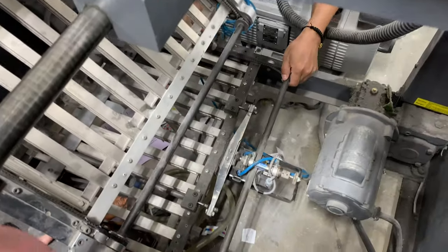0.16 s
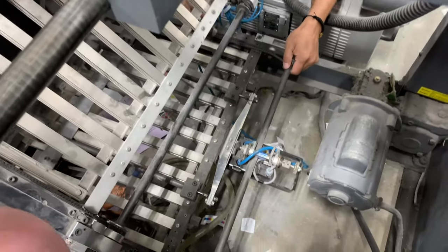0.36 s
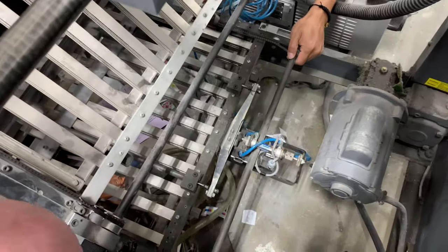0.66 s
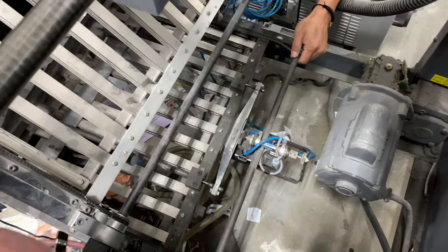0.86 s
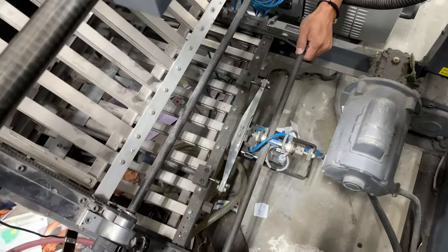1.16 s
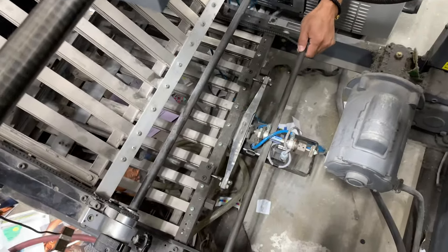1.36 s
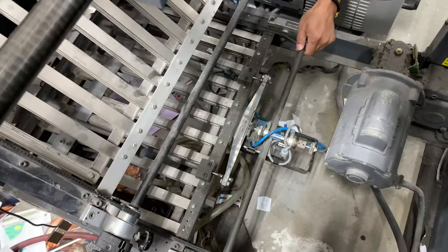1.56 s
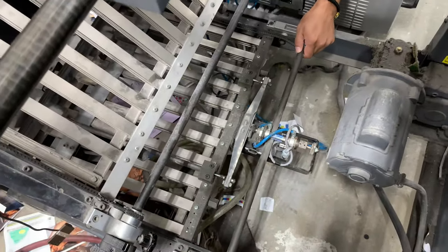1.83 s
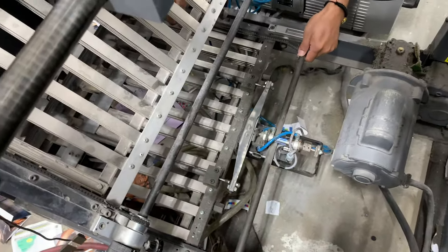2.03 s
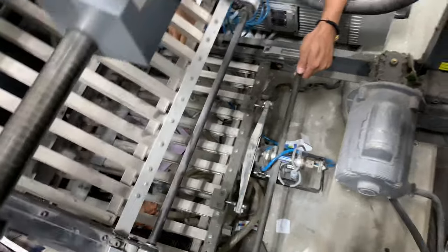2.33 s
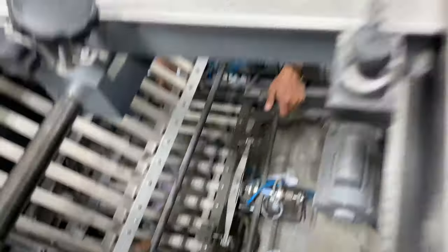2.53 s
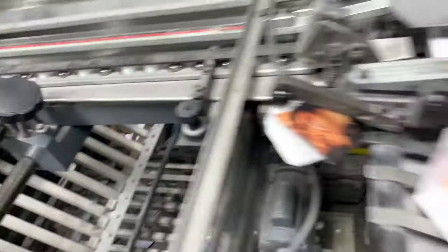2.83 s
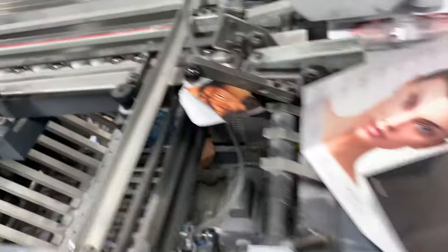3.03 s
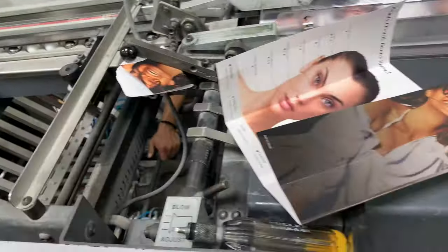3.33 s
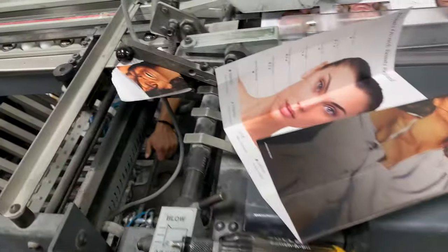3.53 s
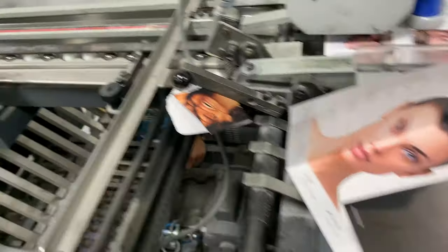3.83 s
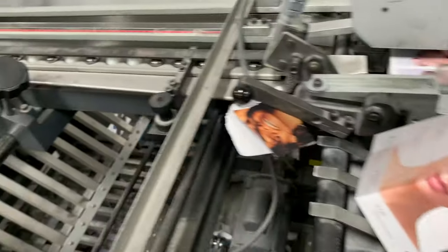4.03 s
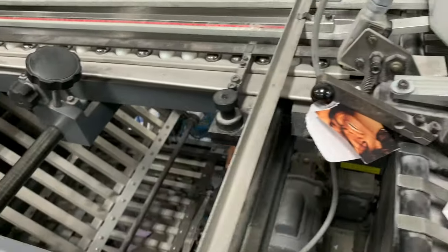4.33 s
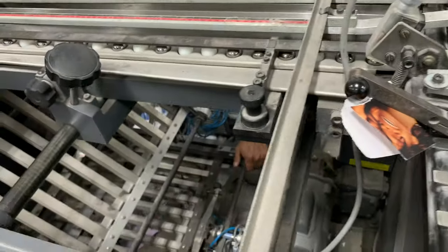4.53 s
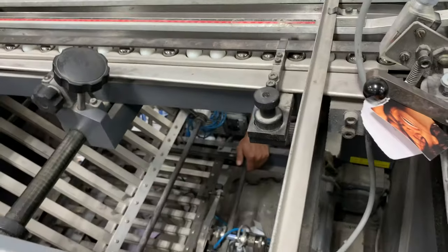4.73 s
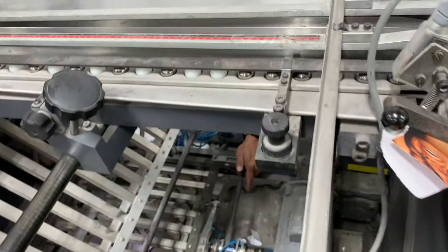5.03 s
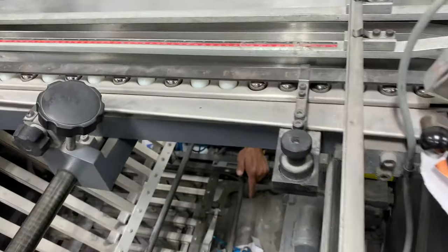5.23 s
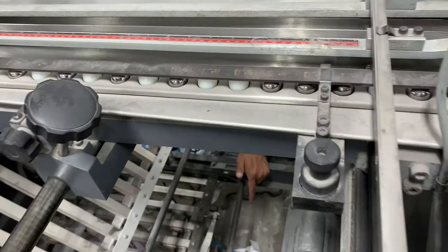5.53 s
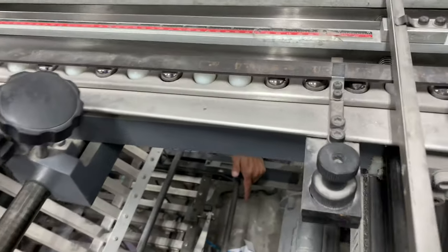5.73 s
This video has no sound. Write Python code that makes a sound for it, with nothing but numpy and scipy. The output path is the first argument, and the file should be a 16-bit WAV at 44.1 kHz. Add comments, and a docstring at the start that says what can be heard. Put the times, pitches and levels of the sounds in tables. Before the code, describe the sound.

Handheld phone stereo, close among machinery indoors. First a low throbbing hum with airy hiss and a couple of ringing steel knocks. Then a thump, a fast motor spin-up, a burst of rushing air and a short rough belt squeal that drops in pitch. The run settles as thin whine grows, and finally loud roller rumble, dull bumps and bright metallic ball chinks crowd in.

```python
"""A print workshop hums and hisses with compressed air, and metal knocks ring a steel frame.
A folding machine then starts with a thump: its motor spins up with a whine, air rushes and a belt slips.
Towards the end the rollers rumble closer, with dull bumps and chinking steel balls.
Rumble and hiss are coloured noise, motor and belt are sine waves, and knocks are noise bursts that ring.
A hand-held phone hears it all through two microphone ports."""
import sys
import numpy as np
from scipy import signal
from scipy.fft import rfft, irfft, next_fast_len
from scipy.io import wavfile
from scipy.ndimage import uniform_filter1d

SR = 44100
rng = np.random.default_rng(int(sys.argv[2]) if len(sys.argv) > 2 else 0)


def decibels_to_gain(level_db):
    """Convert a level in decibels to a linear amplitude gain (20 dB per decade)."""
    exponent = np.asarray(level_db, float) / 20
    return 10 ** exponent


def transcribe(u):
    """Save the signal u as a 16-bit wav file named by the first command-line argument.

    u: samples, shape (n,) or (channels, n), limited to [-1, 1]; the rate is SR.
    q: integer samples, one column per channel.
    """
    v = np.clip(np.atleast_2d(u).T, -1, 1)
    q = np.round(v * 32767).astype(np.int16)
    wavfile.write(sys.argv[1], SR, q)


N = 259749
SIZE = 2 * next_fast_len(N // 2 + 1)  # working length, easy for the Fourier transform
T = np.arange(SIZE) / SR
HZ = np.fft.rfftfreq(SIZE, 1 / SR)


def curves(table):
    """Table columns read at every sample, with straight lines between the rows."""
    s, *columns = np.transpose(table)
    return [np.interp(T, s, column) for column in columns]


def ramp(at, takes):
    """0 before at, 1 once takes s have passed."""
    return np.clip((T - at) / takes, 0, 1)


def fade(at, takes):
    """1 until at, then falling to 1 / e in takes s."""
    return np.exp(-np.maximum(T - at, 0) / takes)


def burst(at, t60, rise=0.0013):
    """Envelope of a blow: a short rise in s, and a 60 dB fall in t60 s."""
    t = np.maximum(T - at, 0)
    return np.minimum(t / rise, 1) * np.exp(-np.log(1000) * t / t60)


def walk(rate):
    """Random levels held for 1 / rate s and smoothed twice; the spread is near 1."""
    hold = int(SR / rate)
    steps = np.repeat(rng.standard_normal(SIZE // hold + 1), hold)
    return 1.206 * uniform_filter1d(uniform_filter1d(steps, hold), hold)[:SIZE]


def ring(hz, width):
    """Gain of a resonance, 1 at its centre; a narrower one rings longer."""
    return 1 / (1 + 2j * (HZ - hz) / width)


# How the two microphone ports differ: f/Hz, phase by which the left leads/rad,
# share of unrelated sound/0-1, left minus right level/dB
PORTS = [(0, 0, 0, 0), (150, .02, .002, .2), (260, .15, .05, 1.2), (650, .5, .3, 3), (1300, .2, .3, 0),
         (2300, 1.0, .3, 0), (3800, 1.4, .2, 0), (4790, np.pi, 0, 0)]


def pair(wide=1.0, stray=0.0):
    """Spectra of white noise at the two ports: part common to both, part separate for each."""
    hz, _, share, _ = np.transpose(PORTS)
    share = np.clip(wide * np.interp(HZ, hz, share) + stray, 0, 1)
    noise = rfft(rng.standard_normal((3, SIZE)))
    return np.sqrt(1 - share) * noise[0] + np.sqrt(share) * noise[1:]


def airy(spectrum, flicker_db, rate, wide=1.0):
    """Coloured noise as a list of frequency bands, each flickering on its own."""
    edges = (0, 150, 400, 1000, 2500, 5000, 8000, 11000, SR)  # Hz
    hz, db = np.transpose(spectrum)
    colour = decibels_to_gain(np.interp(np.log(HZ + 1), np.log(hz), db)) * np.sqrt(SR / 2)
    low_cut = (HZ / 39) ** 14 / (1 + (HZ / 39) ** 14)
    noise = pair(wide) * colour * low_cut
    bands = []
    for lo, hi in zip(edges, edges[1:]):
        band = irfft(noise * ((HZ >= lo) & (HZ < hi)))
        bands.append(decibels_to_gain(flicker_db * walk(rate)) * band)
    return bands


# Colour of the workshop noise: f/Hz, level in each Hz/dB
SHOP = [(45, -64), (120, -63.5), (250, -67), (500, -73), (1000, -78), (1450, -78.5), (2400, -82.5),
        (4000, -84.5), (5200, -78.5), (7200, -84.5), (9000, -71.5), (11000, -66.5), (13000, -67.5),
        (15000, -66)]
# Narrow hums of other machines: f/Hz, width/Hz, level before the changes below/dB
HUMS = [(84, 6, -50), (122, 8, -47), (176, 6, -50), (510, 8, -58), (675, 4, -56), (855, 6, -57),
        (950, 10, -57), (1160, 8, -52), (1184, 4, -48), (1780, 110, -45), (6100, 300, -56)]
# Workshop as the phone moves: t/s, change below 8000 Hz/dB, hum change/dB, air hiss change/dB,
# deep thrum level/dB
MOVE = [(0, 1.5, 0, 0.5, -49), (.5, 1, 1, -1.5, -44), (1.3, 0.5, 1, -1.5, -41), (1.9, -0.5, 3, -1.5, -39.5),
        (2.6, 1, 0.5, 1.5, -43), (3.2, 2, 1, 1, -49), (3.6, 1, -10, -5, -52), (4.8, 1, -2.5, -4, -67),
        (5.9, 7.5, -11, -17, -42)]
# Delay of the hiss reflected off nearby steel: t/s, delay/ms
HISS_ECHO = [(2.1, 3.0), (2.5, 3.3), (3.3, 2.5)]


def workshop():
    """Distant machines below, an air leak hissing above 8000 Hz, and a few wavering hums."""
    body_db, hum_db, hiss_db, thrum_db = curves(MOVE)
    bands = airy(SHOP, flicker_db=0.46, rate=9.33)
    body = sum(bands[:-2])
    hiss = sum(bands[-2:])
    noise = pair()

    # each factor under a root keeps the loudness independent of the width
    tuning = sum(decibels_to_gain(db) * ring(hz, width) * np.sqrt(SR / np.pi / width) for hz, width, db in HUMS)
    hums = irfft(noise * tuning)
    thrum_hz, thrum_width_hz = 41.7, 5.3
    thrum = irfft(noise * ring(thrum_hz, thrum_width_hz) ** 2) * np.sqrt(2 * SR / np.pi / thrum_width_hz)

    # nearby steel reflects the hiss; the late copies strengthen some pitches and weaken others
    echo_ms, = curves(HISS_ECHO)
    echo = 0
    for delay_ms in (echo_ms, echo_ms / 3):
        echo = echo + 0.3 * np.array([np.interp(T - delay_ms / 1000, T, port) for port in hiss])

    hum_level = decibels_to_gain(hum_db + 1.0 * walk(8.4))
    return decibels_to_gain(body_db) * body + hum_level * hums + decibels_to_gain(thrum_db) * thrum + decibels_to_gain(hiss_db) * (hiss + echo)


# Knocks on the steel frame: t/s, peak level/dB, contact time/ms, t60 of the rattle/s
KNOCKS = [(.708, -28, 0.26, .065), (0.715, -7.5, 0.17, 0.063), (0.724, -16.5, 0.11, 0.026),
          (0.734, -11, 0.29, 0.036), (1.619, -18, 0.47, 0.097), (3.284, -21, 0.23, 0.076)]
# Notes of the frame: f/Hz, level/dB, ring time/s (the note falls 60 dB in about 1.26 times this)
FRAME = [(576, -0.5, 0.17), (926, -9, 0.083), (1306, -3, 0.036), (1512, 6, 0.12), (1980, 1, 0.15),
         (2140, 2.5, 0.025), (2450, 3, 0.045), (2670, -6, 0.02), (3140, -3.5, 0.017), (3895, 2, 0.025),
         (5360, 5, 0.036)]


def knocks():
    """Each blow rattles briefly and rings the frame; longer contact is duller."""
    frame = 0.22 + sum(decibels_to_gain(db) * ring(hz, 1.74 / ring_s) for hz, db, ring_s in FRAME)
    frame = frame * (HZ / 500) ** 2 / (1 + (HZ / 500) ** 2)  # little below 500 Hz
    rattle = irfft(pair(wide=0.51, stray=0.3))
    out = 0
    for at, db, contact_ms, t60 in KNOCKS:
        softness = 1 / (1 + 1j * HZ * contact_ms / 600) ** 2
        hit = irfft(rfft(rattle * burst(at, t60)) * frame * softness)
        out = out + decibels_to_gain(db) * hit / np.abs(hit).max()
    return out


# Dull bumps of the rollers in their housing: t/s, level/dB, f/Hz
BUMPS = [(3.284, -26, 600), (5.11, -25, 310), (5.26, -24, 380), (5.45, -26, 560), (5.545, -23.5, 1080),
         (5.57, -22, 473), (5.61, -25, 310), (5.635, -26, 1150), (5.68, -22.5, 670), (5.745, -21, 394),
         (5.79, -26, 950), (5.84, -22, 430)]


def bumps():
    """Each bump is a short dull rattle: noise kept close to its own pitch."""
    width_hz = 96
    noise = pair() * np.sqrt(SR / np.pi / width_hz)
    out = 0
    for at, db, hz in BUMPS:
        rattle = irfft(noise * ring(hz, width_hz))
        out = out + decibels_to_gain(db) * burst(at, t60=0.2, rise=0.0087) * rattle
    return out


# Colour of the air rush: f/Hz, level in each Hz before the rush changes/dB
RUSH = [(60, -78), (130, -75), (300, -68.5), (600, -66), (1200, -66), (2200, -69), (3100, -65), (4000, -73),
        (5200, -63), (6100, -70.5), (7000, -68.5), (8000, -69.5), (9000, -66), (11000, -66.5), (13000, -65),
        (15000, -66.5)]
# Colour of the roller rumble: f/Hz, level in each Hz before nearness and housing/dB
ROLLERS = [(60, -57), (110, -48), (230, -55), (400, -52), (700, -55), (1200, -59), (2400, -64), (3500, -66),
           (5000, -67), (7000, -66), (9000, -70), (13000, -72)]
# Resonances of the roller housing: f/Hz, width/Hz, level change/dB
ROLLER_BODY = [(113, 18, 3.5), (310, 19, 8.5), (408, 13, -7.5), (649, 21, 0.5), (1080, 40, -12)]
# Nearness of the phone to the rollers: t/s, nearness/0 far - 1 close
NEAR = [(4.6, 0.052), (4.9, 0.17), (5.1, 0.48), (5.28, 0.77), (5.4, 0.74), (5.5, 0.79), (5.58, 1),
        (5.78, 0.89), (5.9, 0.72)]


def running():
    """Air rush of the blower and the lumpier rumble of the rollers in their housing."""
    near, = curves(NEAR)
    jolt_s, rush_s, rush_full_s = 3.285, 3.33, 0.11  # jolt and rush start; time the rush takes to build

    build_db = -10 * (1 - ramp(rush_s, rush_full_s)) ** 2
    surge_db = 7.5 * fade(rush_s + rush_full_s + 0.057, 0.26)
    rush_level = decibels_to_gain(build_db + surge_db + 4 * near) * ramp(rush_s, 0.015)
    rush = rush_level * sum(airy(RUSH, flicker_db=0.7, rate=16))

    far_db, close_db = -21.5, -1
    roller_level = decibels_to_gain(far_db + (close_db - far_db) * near)
    jolt = decibels_to_gain(-6) * fade(jolt_s, 0.24) * ramp(jolt_s, 0.052)  # the drive taking up
    lumps = decibels_to_gain(1.5 * walk(14))
    rumble = (roller_level + jolt) * lumps * sum(airy(ROLLERS, flicker_db=1.3, rate=30, wide=0.9))
    housing = 0.88 + sum((decibels_to_gain(db) - 1) * ring(hz, width) for hz, width, db in ROLLER_BODY)
    return (rush + irfft(rfft(rumble) * housing)) * ramp(jolt_s, 0.0056)


# Brush whine: multiple of the shaft rate, level before the whine's growth and wavering/dB
WHINE = [(54, -6), (59, -6), (61, -2), (62, -4), (63, 0), (64, -3), (65, -2), (66, -5), (67, -3), (68, -4),
         (70, -1), (71, -4), (79, -6)]


def motor():
    """Shaft tone with its octave, and high shaft multiples from the brushes that come and go."""
    near, = curves(NEAR)
    switch_s, spin_up_s, crawl_hz, shaft_hz = 3.3, 0.11, 45.22, 197.4
    full_speed_s = switch_s + spin_up_s
    speed = ramp(switch_s, spin_up_s)
    hz = crawl_hz + (shaft_hz - crawl_hz) * speed
    turn = 2 * np.pi * np.cumsum(hz * (1 + 0.000574 * walk(3.2))) / SR

    # the strain of starting makes the tone louder, then eases
    strain_fade_s = 0.07
    strain = fade(full_speed_s + 0.061, strain_fade_s)
    tone_level = decibels_to_gain(-35 + 10 * strain + 5.5 * near ** 2) * ramp(switch_s, 0.08)
    octave_level = decibels_to_gain(-14 + 3 * fade(full_speed_s, strain_fade_s))  # against the shaft tone
    tone = tone_level * (np.sin(turn) * decibels_to_gain(0.5 * walk(12)) + octave_level * np.sin(2 * turn))

    start_db, grown_db = -58, -37
    whine_db = start_db + (grown_db - start_db) * ramp(full_speed_s, 0.92)
    # k * k only staggers the starting points of the waves
    partials = sum(decibels_to_gain(db + 3.3 * walk(2.6)) * np.sin(k * turn + k * k) for k, db in WHINE)
    whine = partials * decibels_to_gain(whine_db) * speed
    return np.sqrt(2) * (tone + whine)


def belt():
    """A slipping belt: a rough squeal that steps down in pitch and sinks as the slip ends."""
    slip_s, step_s, grip_s, edge_s = 3.55, 3.765, 3.86, 0.014
    sinking_hz = 2870 - 800 * (T - step_s)
    hz = np.where(T < step_s, 2990, sinking_hz)
    swell_db = -36.5 + 4 * ramp(slip_s, 0.2)
    tail_db = -4 * ramp(step_s, grip_s - step_s)
    level = decibels_to_gain(swell_db + tail_db) * ramp(slip_s, edge_s) * (1 - ramp(grip_s, edge_s))
    turn = 2 * np.pi * np.cumsum(hz * (1 + 0.008 * walk(120))) / SR  # fast pitch jitter: roughness
    return level * decibels_to_gain(3 * walk(60)) * np.sqrt(2) * np.sin(turn)


# Loose steel balls chinking in their guide: t/s, ring level/dB, snap level/dB
CHINKS = [(4.92, -8, -25), (5.121, -3, -30), (5.302, -24, -13.5), (5.311, -7, -8), (5.46, -4, -25),
          (5.58, -3, -25), (5.61, -2, -23), (5.669, 0.5, -32), (5.722, -3.5, -24), (5.78, -2, -33),
          (5.82, -7, -32)]
# Notes of the balls and guide: f/Hz, width/Hz, level/dB
BALLS = [(2750, 120, -10), (4600, 80, 0), (5200, 100, -4), (5430, 100, -5), (5980, 100, -8),
         (7400, 400, -14)]


def chinks():
    """Short bright rattles ringing in the balls and their guide, each with a broader snap."""
    t60_s = 0.11
    noise = irfft(pair(stray=0.17))
    shake = noise * sum(decibels_to_gain(db) * burst(at, t60_s) for at, db, _ in CHINKS)
    snap = noise * sum(decibels_to_gain(db) * burst(at, t60_s, rise=0.0035) for at, _, db in CHINKS)
    body = sum(decibels_to_gain(db) * ring(hz, width) for hz, width, db in BALLS)
    return irfft(rfft(shake) * body + rfft(snap) * ring(6100, 4700))


def scene():
    """All sources as they reach the two ports."""
    return (workshop() + knocks() + bumps() + running() + motor() + belt() + chinks())[:, :N]


def low_pass(x):
    """Removes everything above the highest recorded frequency."""
    return signal.sosfilt(signal.butter(12, 17000, fs=SR, output="sos"), x)


# Bass turning out of phase as the phone swings along the machine:
# from f/Hz, to f/Hz, phase by which the left port then lags/rad
BASS_LAG = [(30, 90, 0.79), (88.3, 200, 1.3), (152, 280, 3.9), (254, 300, 5.1)]


def record(dry):
    """The ports differ in level and arrival time, so the pair goes in and out of phase across pitch."""
    hz, lead, _, pan_db = np.transpose(PORTS)
    # above the table the lead grows a full turn in every 4190 Hz
    lead = np.interp(HZ, hz, lead) + 2 * np.pi * np.maximum(HZ - hz[-1], 0) / 4190
    # in the treble the lead moves in steps: near a whole or half turn it locks onto it
    turns = np.pi * np.round(lead / np.pi)
    lead = np.where((abs(lead - turns) < 0.8) & (turns > 0), turns, lead)

    # each port takes half of the difference
    half = decibels_to_gain(np.interp(HZ, hz, pan_db) / 2) * np.exp(0.5j * lead)
    low_cut = 1 / (1 + (35.3 / (HZ + 1)) ** 8)
    ports = rfft(dry, SIZE) * np.array([half, 1 / half]) * (HZ < 15750) * low_cut
    out = irfft(ports)

    swing = ramp(4.82, 0.29) ** 2
    for lo_hz, hi_hz, rad in BASS_LAG:
        bass = ports[0] * (HZ >= lo_hz) * (HZ < hi_hz)
        lag = rad * swing
        # swap this band of the left port for its delayed self
        out[0] += irfft(bass) * (np.cos(lag) - 1) + irfft(-1j * bass) * np.sin(lag)
    return low_pass(out[:, :N])


dry = scene()
out = record(dry)
transcribe(out)
```